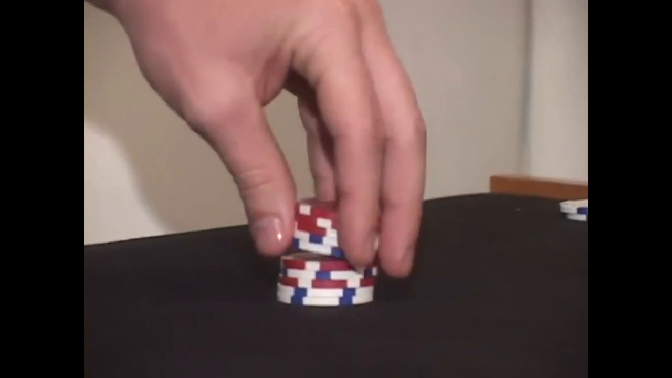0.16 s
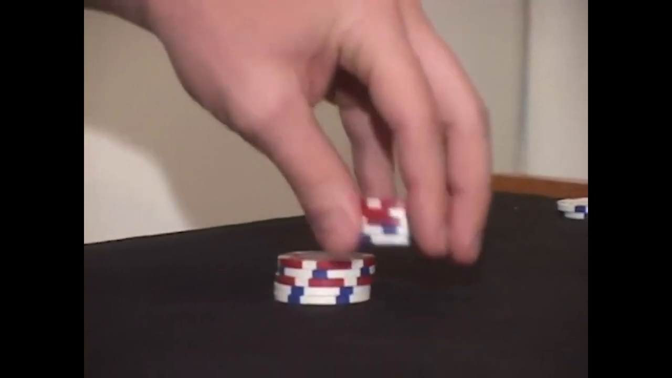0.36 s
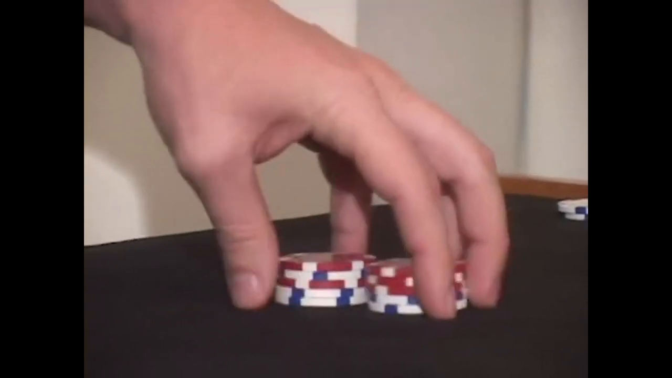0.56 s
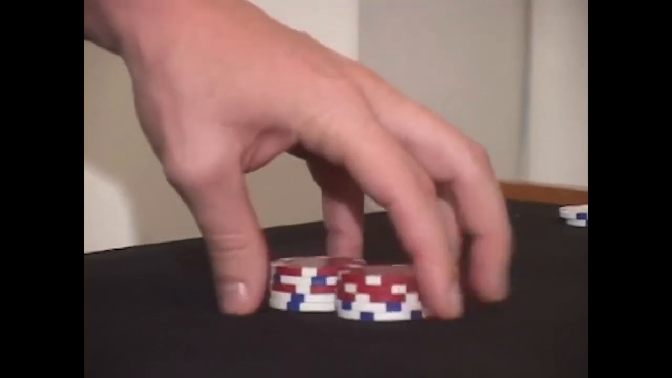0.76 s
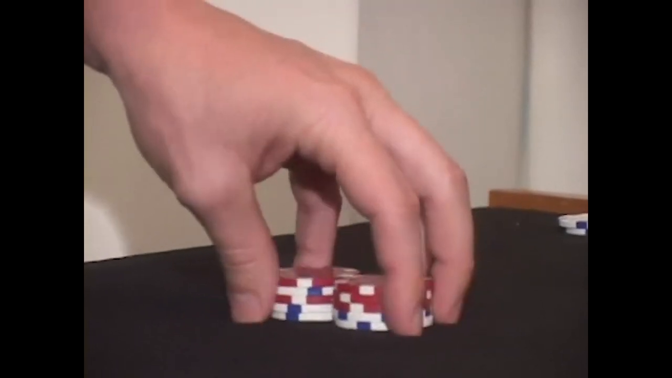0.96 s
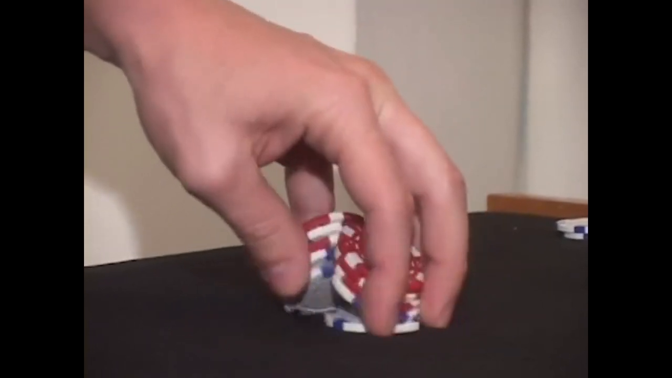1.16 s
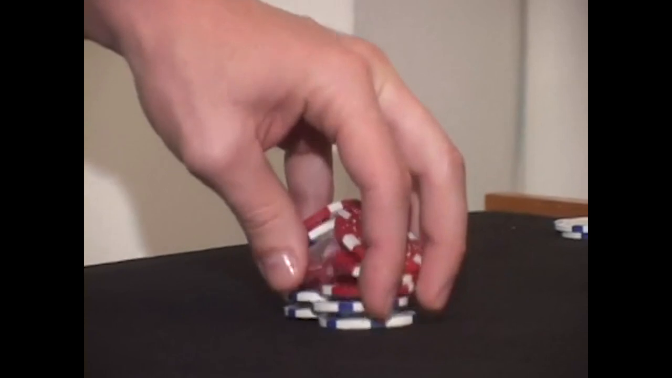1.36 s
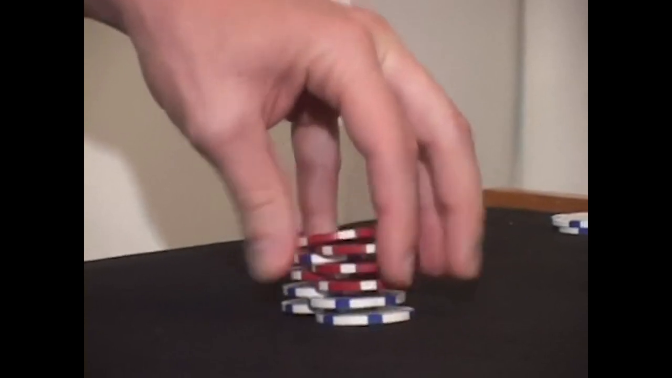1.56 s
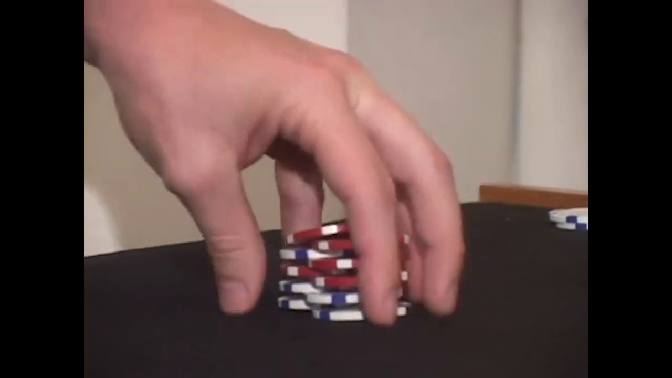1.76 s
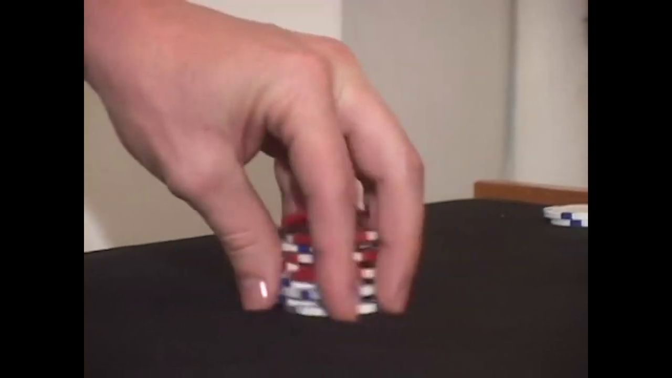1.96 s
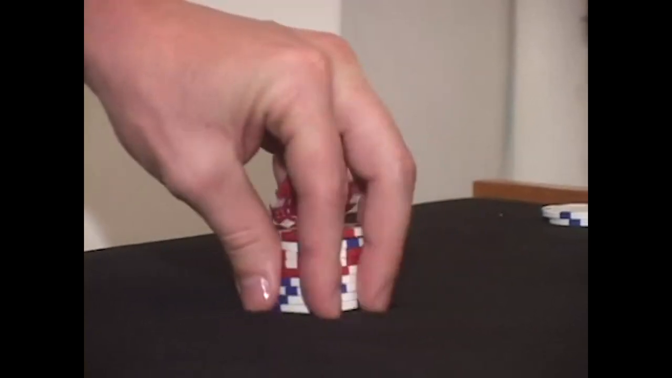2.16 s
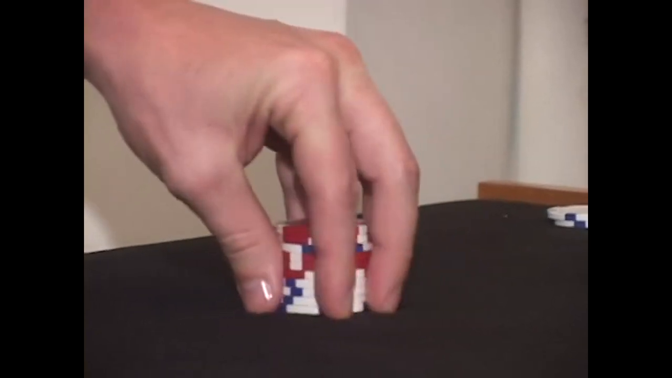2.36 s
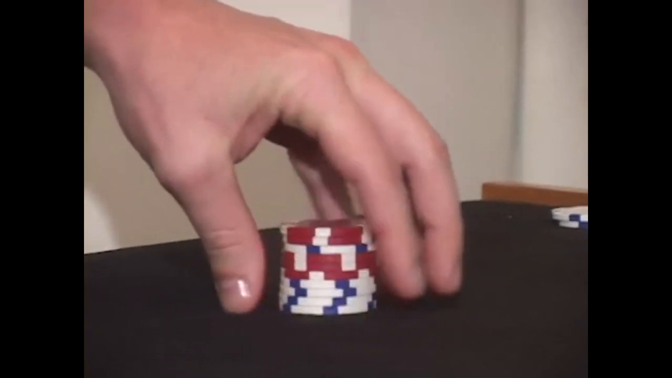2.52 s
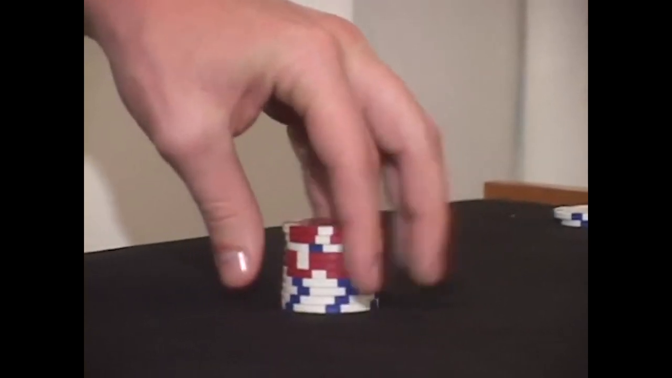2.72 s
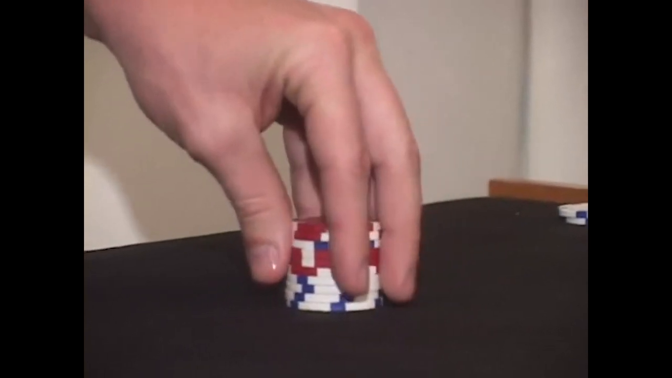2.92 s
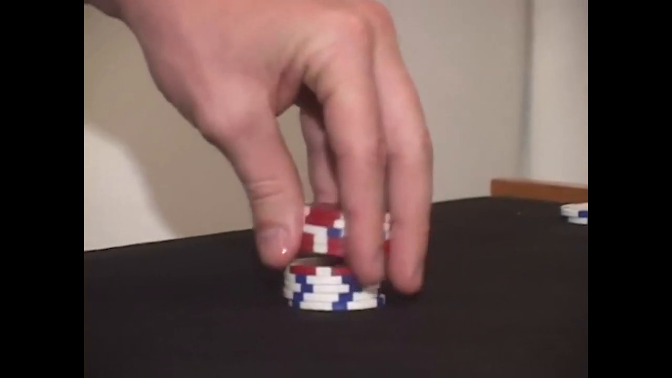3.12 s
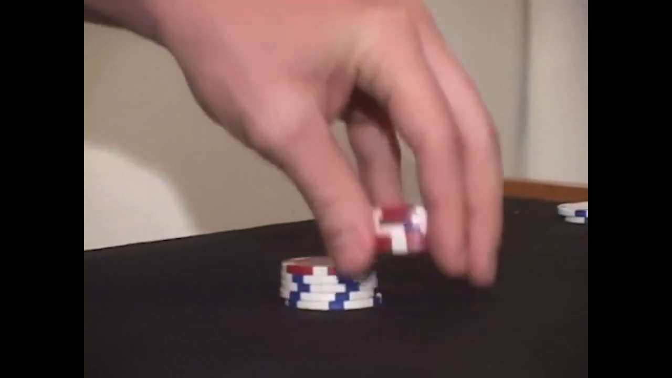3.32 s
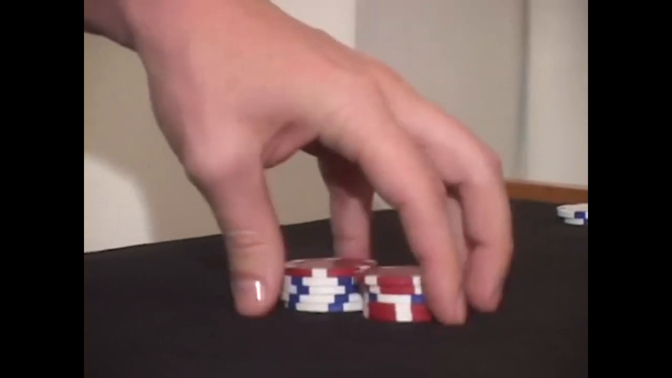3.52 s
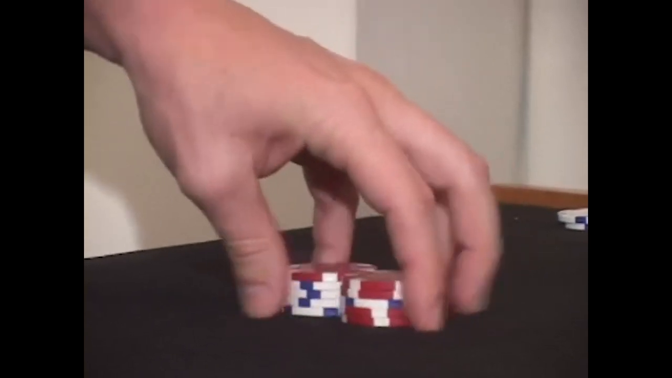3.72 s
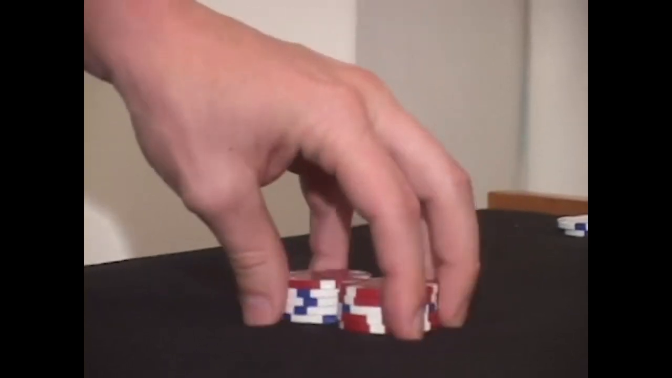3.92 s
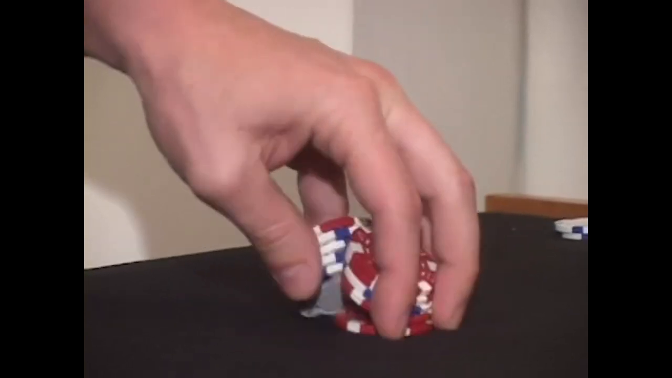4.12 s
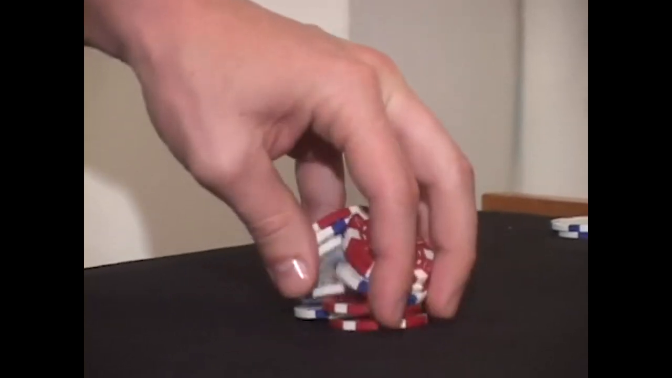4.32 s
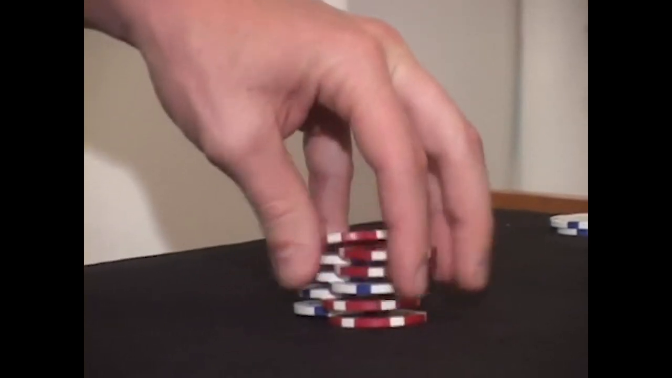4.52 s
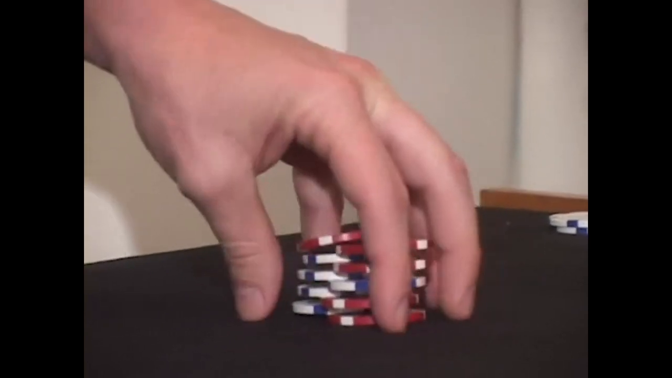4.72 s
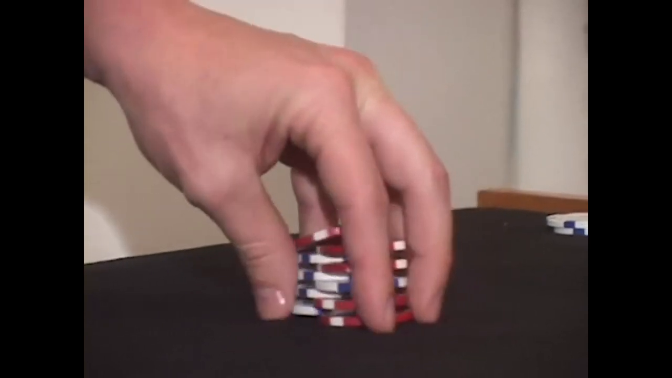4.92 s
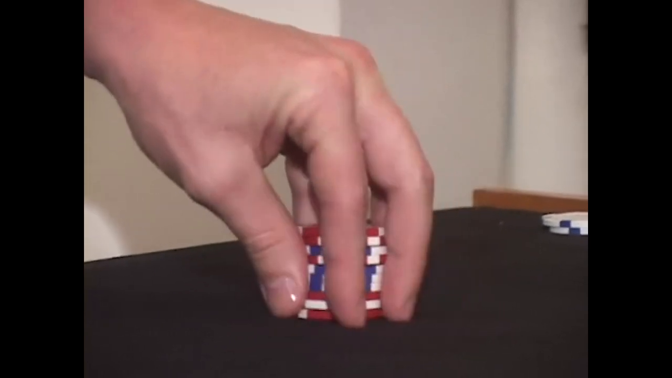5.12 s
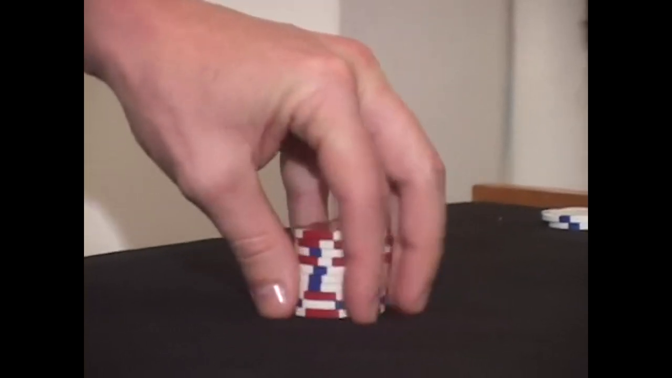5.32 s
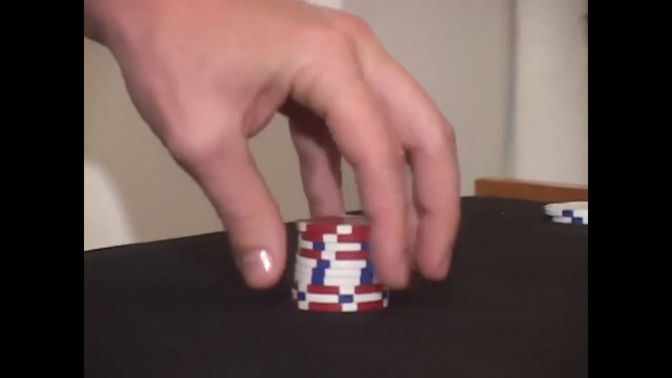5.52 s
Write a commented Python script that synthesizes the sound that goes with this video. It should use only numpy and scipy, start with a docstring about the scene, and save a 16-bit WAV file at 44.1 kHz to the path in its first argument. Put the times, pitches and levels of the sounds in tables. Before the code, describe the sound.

A hand splits and riffles a small stack of clay chips two times, bright clicks and short rattles with dull table thumps.

```python
"""Mains hum, a fan tone and hiss, all steady sines and shaped noise, lie under a small room near a camera.
From 0.55 s a hand splits a stack of clay chips and sets half down on a felt table, which booms when pushed.
It riffles the halves together around 1.5 s and squares them; from 3.5 s it does so again, with a riffle at 4.4 s.
Each chip contact is a few milliseconds of spiky noise that rings the modes of the discs and of the stack.
Noise tails make the room's answer; the chips and table are heard almost in mono."""
import sys
import numpy as np
from scipy import signal
from scipy.fft import rfft, irfft, next_fast_len
from scipy.io import wavfile
from scipy.ndimage import map_coordinates

SR = 44100
rng = np.random.default_rng(int(sys.argv[2]) if len(sys.argv) > 2 else 0)


def wav_record(signal):
    """Record a signal, one row per channel, as 16-bit PCM in the file named by sys.argv[1]."""
    frames = np.transpose(np.atleast_2d(signal))
    bounded = np.clip(frames, -1, 1)
    # unit amplitude maps onto the largest positive 16-bit level
    quanta = np.round(bounded * 32767).astype(np.int16)
    wavfile.write(sys.argv[1], SR, quanta)


def gain_from_db(level_db):
    """Turn a decibel level (scalar or array-like) into a linear amplitude factor."""
    decades = np.asarray(level_db, float) / 20
    return 10 ** decades


N = 245637  # samples


def along(points, hz):
    """Reads (f/Hz, value) points on a log frequency axis."""
    f, value = np.transpose(points)
    return np.interp(np.log(hz + 1), np.log(f + 1), value)


def coloured(x, points):
    """Passes x through a (f/Hz, level/dB) spectrum."""
    size = next_fast_len(N + 8192)
    gain = gain_from_db(along(points, np.fft.rfftfreq(size, 1 / SR)))
    return irfft(rfft(x, size) * gain, size)[..., :N]


def highpassed(x, hz, order):
    """Cuts the lows below hz."""
    return signal.sosfilt(signal.butter(order, hz, "high", fs=SR, output="sos"), x)


def wobble(rate):
    """A smooth random curve with rate knots a second."""
    knots = rng.standard_normal(int(N * rate / SR) + 4)
    return map_coordinates(knots, [np.arange(N) * rate / SR])


def ringing(modes, count, length, detune, scatter_db):
    """Decaying sines for count blows, each with its own tuning and mode strengths, peak near 1."""
    hz, db, t60 = np.transpose(modes)[:, None, :, None]
    t = np.arange(round(length * SR)) / SR
    chance = rng.standard_normal((count, 2, len(modes), 1))
    pitch = hz * (1 + detune * chance[:, 0])
    envelope = gain_from_db(db + scatter_db * chance[:, 1] - 60 * t / t60)
    waves = envelope * np.sin(2 * np.pi * pitch * t)
    return waves.sum(1) / np.linalg.norm(gain_from_db(db))


def placed(times, sounds):
    """Lays each row of sounds on the timeline from its own time in seconds."""
    at = np.round(times * SR).astype(int)[:, None] + np.arange(sounds.shape[1])
    return np.bincount(at.ravel(), sounds.ravel(), N + SR)[:N]


def hum_lines():
    """Mains hum and a fan tone: sines that waver slightly in level and phase."""
    # mean strength of each line: f/Hz, rms level/dB
    lines = [(59.2, -73), (118.4, -77), (150.7, -61.5), (220.7, -76), (301.5, -76)]
    t = np.arange(N) / SR
    hum = 0
    for hz, db in lines:
        level = np.sqrt(2) * gain_from_db(db + 1.1 * wobble(12))
        phase = 0.5 * wobble(3.4) + rng.uniform(0, 2 * np.pi)
        hum = hum + level * np.sin(2 * np.pi * hz * t + phase)
    return hum


def background():
    """Hum in the middle under hiss, which is noise with some side of its own; gives mid and side."""
    # shape of the hiss: f/Hz, relative density/dB
    hiss_shape = [(20, 2), (60, 13), (110, 4), (170, 5.5), (250, 2), (400, -1.5), (800, -4.5), (2000, -9.5),
                  (5000, -10.5), (8000, -11.5), (9500, -19), (10800, -56), (13000, -57)]
    # width of the hiss: f/Hz, side minus mid/dB
    hiss_side = [(60, -38), (300, -24.5), (800, -19.5), (5000, -11.5)]
    mid, side = coloured(rng.standard_normal((2, N)), hiss_shape)
    scale = gain_from_db(-67.5) / np.std(mid)  # rms dB of the mid
    return np.array([hum_lines() + scale * mid, scale * coloured(side, hiss_side)])


def room(x):
    """Near walls answer fast, the rest lingers faintly; a fresh noise tail serves each third of a second."""
    # fast part of the answer: f/Hz, t60/s
    fast_t60 = [(200, 0.25), (1500, 0.15), (5000, 0.12), (9000, 0.1), (15000, 0.12)]
    # slow part of the answer: f/Hz, level against the fast part/dB
    slow_level = [(300, -18), (2000, -21.5), (4000, -27.5), (5600, -25), (8000, -31), (14000, -29)]
    out, step = np.zeros(N + 2 * SR), SR // 3
    for start in range(0, N, step):
        hz, t, z = signal.stft(rng.standard_normal(SR * 2 // 3), SR, nperseg=256)
        fast = gain_from_db(-60 * t / along(fast_t60, hz)[:, None])
        slow = gain_from_db(along(slow_level, hz)[:, None] - 60 * t / 1.46)
        tail = signal.istft(z * (fast + slow), SR, nperseg=256)[1]
        tail[:round(.004 * SR)] = 0  # the first wall is a metre or so away
        wet = signal.fftconvolve(x[start:start + step], tail / np.linalg.norm(tail))
        out[start:start + len(wet)] += wet
    return out[:N]


def smeared_side(near):
    """The near sound smeared by a short noise burst makes a faint left-right difference."""
    # width of the near sounds before the flicker: f/Hz, side minus mid/dB
    near_width = [(60, -37.5), (400, -29.5), (2500, -26), (5000, -28), (15000, -22)]
    t = np.arange(SR // 40) / SR
    smear = rng.standard_normal(len(t)) * gain_from_db(-60 * t / 0.0067)
    smeared = signal.fftconvolve(near, smear / np.linalg.norm(smear))[:N]
    return coloured(smeared, near_width)


def table_top():
    """A soft push through the felt sets the table top booming; the felt itself gives a dull slap."""
    # pushes: t/s, boom level/dB, felt slap level/dB, share of a 0.085 s ringing time that the hand allows
    thumps = [(0.56, -41, -42.5, 0.7), (1.324, -47, -46.5, 0.22), (1.545, -48.5, -55.5, 0.51),
              (2.329, -67, -53, 0.44), (3.511, -46, -46.5, 0.81), (3.5188, -36, -72.5, 0.49),
              (3.573, -49.5, -69, 0.23), (4.319, -63.5, -55, 0.39), (4.444, -39.5, -55, 0.2)]
    # modes of the undamped table top: f/Hz, relative level/dB, t60/s
    top_modes = [(80, -10, 0.04), (108, -44, .1), (142.3, 8, 0.87), (244.8, 3, 0.36), (414, -34, 0.091),
                 (694, -5, 0.026)]
    s, boom_db, slap_db, share = np.transpose(thumps)[:, :, None]
    boom = ringing(top_modes, len(s), 0.27, detune=0.00091, scatter_db=-0.5)
    t = np.arange(boom.shape[1]) / SR
    boom = boom * gain_from_db(-60 * t / 0.085 * np.clip(1 / share - 1, -.5, 5))  # the hand damps the top
    felt = signal.butter(2, [330, 1100], "band", fs=SR, output="sos")
    slap = signal.sosfilt(felt, rng.standard_normal(boom.shape))
    slap = slap / np.std(slap) * gain_from_db(-60 * t / 0.036)
    thump = gain_from_db(slap_db) * slap - gain_from_db(boom_db) * boom
    return highpassed(placed(s[:, 0], thump), 47, order=2)


def rattles(count):
    """Discs slide or fall into place: count loosely spaced contacts a run, strength moving first to last."""
    # runs, as means: from t/s, to t/s, first discs level/dB, last discs level/dB, brightness, knock level/dB
    runs = [(0.645, 0.784, -71, -73.5, .3, -70), (1.456, 1.483, -59, -59, 0.23, -57),
            (1.522, 1.562, -32.5, -40, 0.43, -53.5), (1.582, 1.617, -30.5, -56, 0.431, -57),
            (4.448, 4.489, -41.5, -38, -0.25, -52), (4.577, 4.663, -40, -58.5, 0.16, -64)]
    start, end, first_db, last_db, bright, knock_db = np.transpose(runs)[:, :, None]
    place = (np.arange(count) + rng.uniform(0, 1, (len(runs), count))) / count
    chance = rng.standard_normal((4, len(runs), count))
    uneven_db, uneven_bright, typical_ms = 3.5, 0.42, 4.2
    times = start + (end - start) * place
    discs_db = first_db + (last_db - first_db) * place + uneven_db * chance[0]
    bright = bright + uneven_bright * chance[1]
    knock_db = knock_db + uneven_db * chance[2]
    chatter_ms = typical_ms * np.exp(0.3 * chance[3])
    return np.reshape([times, discs_db, bright, knock_db, chatter_ms], (5, -1)).T


def chatter(chatter_ms):
    """Faces never meet flat: spiky noise closes in and swells, stops short and settles faintly."""
    t = np.arange(SR // 50) / SR
    touch = rng.standard_normal((len(chatter_ms), len(t)))
    progress = t * 1000 / np.clip(chatter_ms, .2, 9)
    touch *= np.abs(touch) ** 0.56 * progress ** 0.35
    touch *= np.exp(-progress ** 1.85) + 0.16 * np.exp(-progress / 2.5)
    return touch


def chips():
    """Each chatter strikes four mode families: clink, clack and ring of the discs, knock of the stack."""
    # single contacts: t/s, discs level before the split by brightness/dB,
    # brightness (-1 clink, 0 clack, 1 ring), stack knock level/dB, chatter time scale before its limits/ms
    contacts = [(0.5541, -50, 0.01, -48, 3.7), (0.5599, -32, 0.64, -40.5, 0.95),
                (0.5766, -47, 0.23, -43, 1.3), (0.586, -62, 0.45, -51, 5.9),
                (0.6227, -43.5, 0.46, -67, 1.4), (0.6262, -38.5, 0.37, -45.5, 2.6),
                (0.6487, -54, 0.44, -51.5, 4.5), (0.6803, -79, 0.77, -54, 1.8),
                (0.7102, -70, 0.5, -55.5, 2), (0.7408, -77, 0.01, -59, 2.7), (1.2823, -61, 0.018, -57, 3.2),
                (1.3107, -44, 0.01, -38, 1.9), (1.316, -38.5, 0.59, -68, 9.3),
                (1.3235, -33, 0.81, -35.5, 3.5), (1.3403, -44.5, -1.1, -46.5, 1.3),
                (1.3536, -55, -1.1, -68, 2.2), (1.4029, -56.5, 0.4, -52.5, 1.6),
                (1.4458, -48.5, -0.54, -54, 4.7), (1.491, -28.5, 0.62, -45.5, 3.2),
                (1.51, -42.5, -0.72, -48, 7), (1.5207, -29.5, 0.62, -48, 1.6),
                (1.5408, -24, 0.31, -52, 4.2), (1.5462, -22.5, 0.64, -58, 3.8), (1.5541, -30, .9, -48, 2.5),
                (1.5666, -27, 0.62, -50, 5), (1.5762, -22.5, 0.96, -55, 1.7), (1.7213, -47, 0.89, -79, 2.2),
                (1.7274, -56, 0.081, -80, 2.5), (1.7625, -60, 0.042, -76, 2.5),
                (2.0915, -55, .3, -57.5, 4.2), (2.3283, -31, 0.33, -48, 3.8),
                (2.3383, -43.5, 0.041, -79, 2.8), (2.3447, -51, 0.25, -73, 2.5),
                (2.4474, -55, 0.3, -58, 0.98), (3.506, -33.5, 0.53, -41.5, 1.9),
                (3.5125, -35.5, -0.21, -43, 1.1), (3.5241, -59, -0.35, -70, 3.5),
                (3.5596, -50, .2, -57, 4.2), (3.5672, -41, .95, -45, 3.4), (3.5721, -35.5, .15, -43, 3.7),
                (3.5783, -30.5, -0.03, -63, 2.6), (3.5808, -31.5, 1, -42, 3.2),
                (3.5866, -33, 0.69, -51, 0.95), (3.6112, -41, .4, -52.5, 1.7), (3.6953, -65, 0.75, -56, 6),
                (3.712, -71, 0.87, -56.5, 3.1), (3.8376, -63.5, 1, -55.5, 0.63),
                (4.3158, -36.5, 0.65, -47, 4.6), (4.3301, -48, -0.92, -52, 1.1),
                (4.4218, -30, 0.63, -47.5, 5.8), (4.4284, -35.5, -1.1, -68, 9.8),
                (4.4345, -51, -.7, -42, 0.9), (4.4416, -22.5, .35, -50, 1.13), (4.4471, -41, 0.2, -53, 1.4),
                (4.4644, -33, -0.74, -46, 2.5), (4.4965, -34.5, 0.51, -44, 1.8),
                (4.503, -32.5, 0.4, -47, 3.5), (4.5083, -37.5, 0.75, -65, 0.8),
                (4.5303, -58, -0.75, -66, 2.7), (4.5367, -43, -1.2, -51.5, 2.9),
                (4.5501, -42.5, 0.01, -57, 1.1), (4.573, -40, 0.35, -50, 2.3),
                (5.097, -46.5, -0.24, -51, 3.2), (5.111, -60, -0.079, -62.5, 4.5),
                (5.1555, -58, .2, -58, 4.2), (5.1768, -58, -0.02, -65, 3.5), (5.4026, -64, 0.26, -61, 2.1)]
    # four families of modes, each: f/Hz, relative level/dB, t60/s
    # free discs
    ring_modes = [(6707, -11.5, 0.051), (6500, -25, 0.019), (7275, 7.5, 0.023), (8200, -20, 0.01),
                  (8860, -42, 0.0076), (9620, -17, 0.02), (9220, -10.5, 0.0095), (14280, -9.5, 0.021),
                  (15300, -6.5, 0.022)]
    # discs damped in the stack
    clack_modes = [(5086, 0, 0.036), (5370, 7.5, 0.0074), (5556, 27, 0.0036), (6060, 3.5, 0.012),
                   (5736, 0, 0.05)]
    # the discs' lowest bending
    clink_modes = [(4140, -7, 0.025), (4275, 6.5, 0.033), (4557, 7.5, 0.032), (5030, -6, 0.089)]
    # the stack as a whole
    knock_modes = [(830, -10, 0.018), (1425, -5, 0.067), (1870, 2, 0.019), (2043, 11, 0.02),
                   (2290, 8.5, 0.026), (2562, 10, 0.021), (2823, 5.5, 0.016), (3244, 10.5, 0.0065)]
    # how loosely the discs lie while they fall: t/s, gain of the clink/dB
    looseness = [(1.5, 0.1), (1.545, 3.7), (1.58, 7.2), (1.63, 4.7), (1.7, 0.1), (4.4, 0.1), (4.425, 1.9),
                 (4.49, 1.9), (4.5, 0.1), (4.56, 0.1), (4.58, 5.4), (4.67, 3), (4.8, 0.1)]
    # the discs send out little between their upper modes: f/Hz, level/dB
    disc_output = [(7700, -0.5), (8500, -7), (9100, 6), (9800, 2), (10400, -16.5), (13800, 4)]

    s, discs_db, bright, knock_db, chatter_ms = np.transpose([*contacts, *rattles(count=8)])[:, :, None]
    # a family loses 9.5 dB for each step that it lies from the brightness
    clink_db, clack_db, ring_db = [discs_db - 9.5 * np.abs(np.clip(bright, -1, 1) - step)
                                   for step in (-1, 0, 1)]
    loose_db = np.interp(s, *np.transpose(looseness))
    clink_db = clink_db + loose_db
    clack_db = clack_db - 0.49 * loose_db  # the clack loses a share of that gain
    touch = chatter(chatter_ms)
    burst_s = .004  # levels are the rms of a burst this long with the contact's energy
    sound = 0
    for db, modes, edge_db, low_hz in [(ring_db, ring_modes, -8, 5000), (clack_db, clack_modes, -9, 4400),
                                       (clink_db, clink_modes, -16, 3850), (knock_db, knock_modes, -8, 950)]:
        body = ringing(modes, len(s), .06, detune=0.014, scatter_db=1.5)
        body[:, 0] = gain_from_db(edge_db)  # the bare impact, too brief to ring
        struck = signal.fftconvolve(touch, body, axes=1)
        struck = highpassed(struck, low_hz, order=6)  # small bodies radiate no bass
        burst = np.linalg.norm(struck, axis=1, keepdims=True) / np.sqrt(burst_s * SR)
        sound = sound + gain_from_db(db) * struck / burst
    return coloured(placed(s[:, 0], sound), disc_output)


def scene():
    """Chips, table and room sit in the middle over the background; a faint side flickers on and off."""
    direct = chips() + table_top()
    near = direct + gain_from_db(-8.5) * room(direct)
    mid, side = background() + [near, smeared_side(near)]
    side = side * gain_from_db(13 * np.tanh(2.5 * wobble(28)) - 6)  # the hiss's side flickers along
    return np.array([mid + side, mid - side])


def roll_off(x):
    """The treble ends steeply here."""
    return signal.sosfilt(signal.butter(12, 16620, fs=SR, output="sos"), x)


def record(dry):
    """Little sound passes between 11 and 13 kHz."""
    # overall tone: f/Hz, level/dB
    response = [(9900, -0.5), (10500, 4), (11000, -38), (13600, -40), (13900, -8.5), (15700, -7),
                (16000, -49)]
    mix = coloured(dry, response)
    return roll_off(mix)


dry = scene()
out = record(dry)
wav_record(out)
```